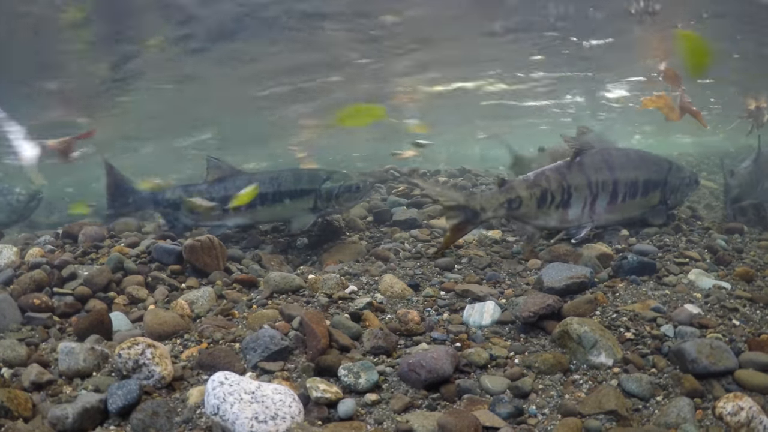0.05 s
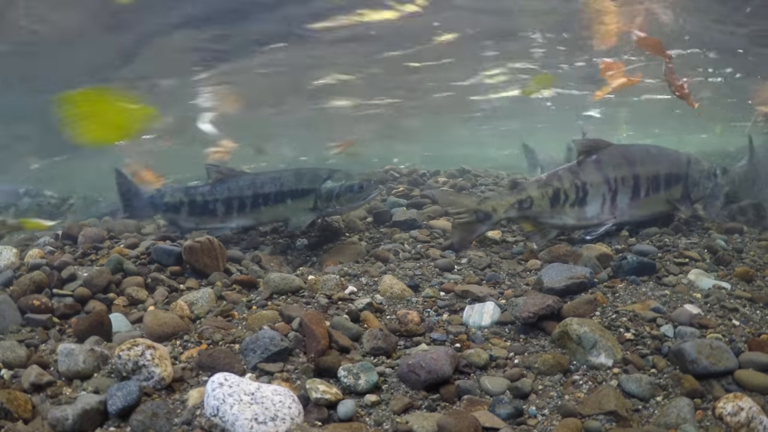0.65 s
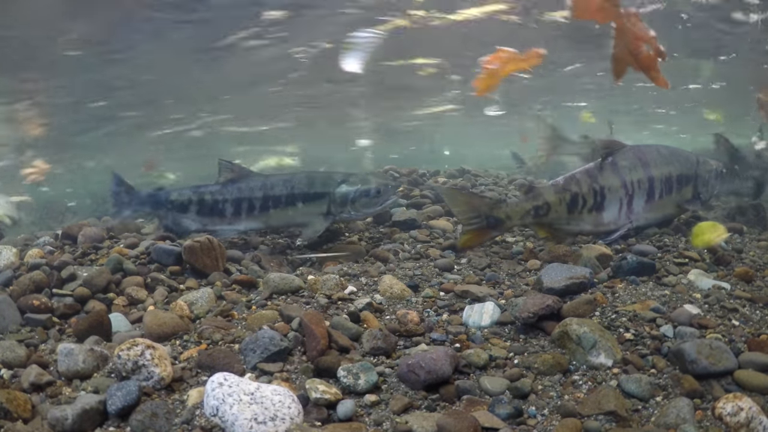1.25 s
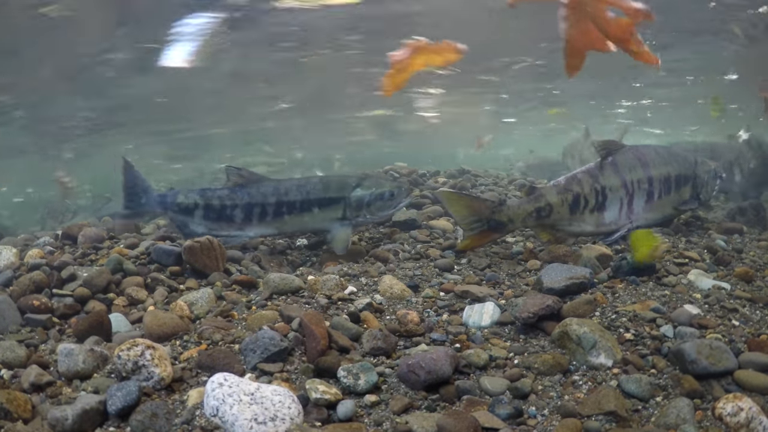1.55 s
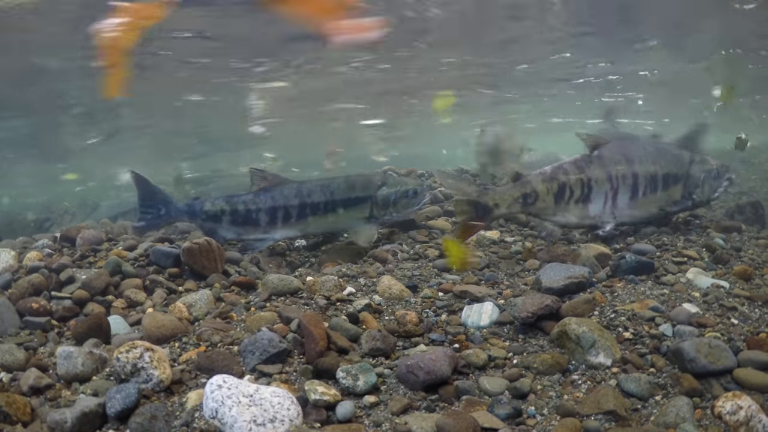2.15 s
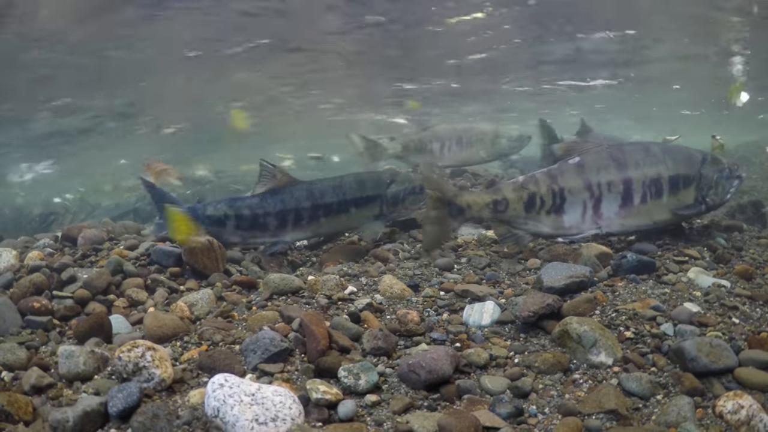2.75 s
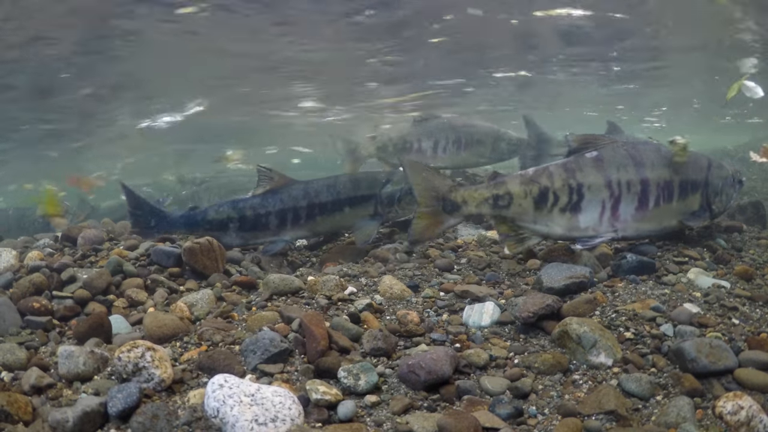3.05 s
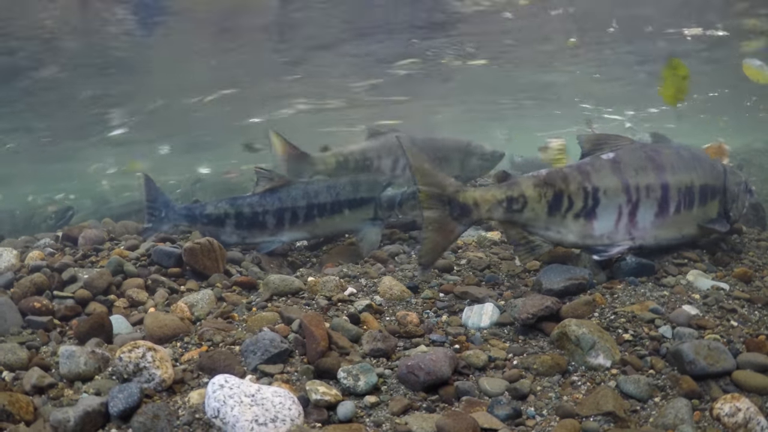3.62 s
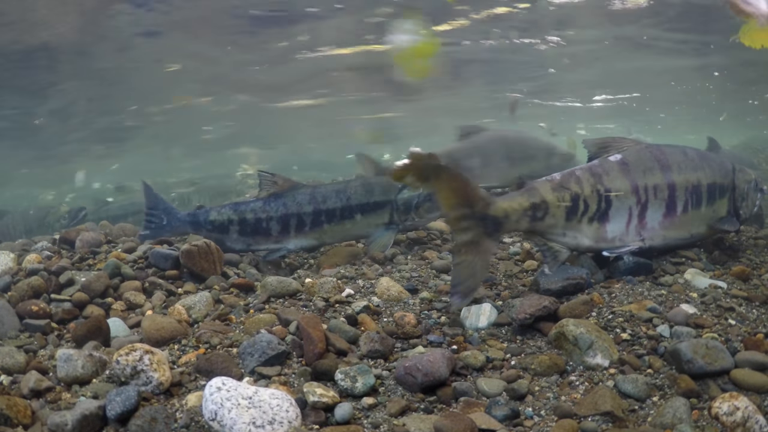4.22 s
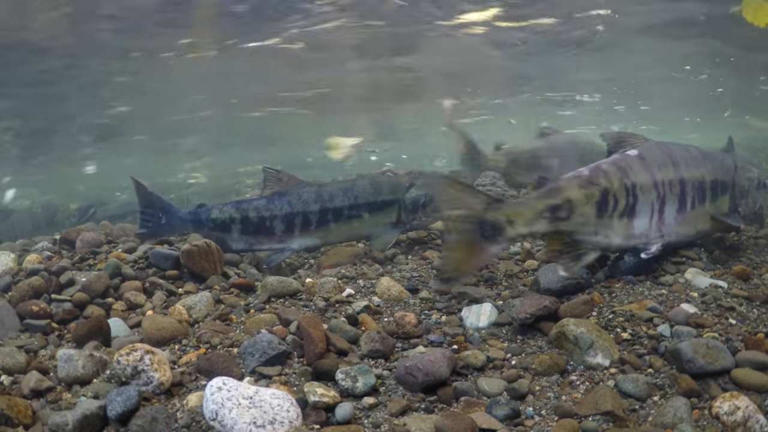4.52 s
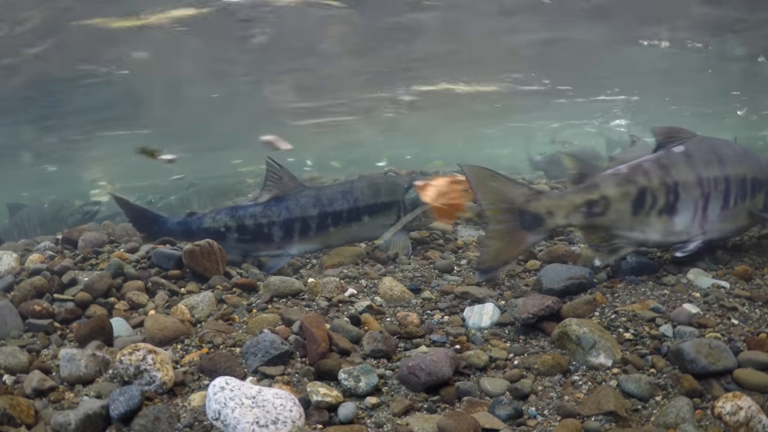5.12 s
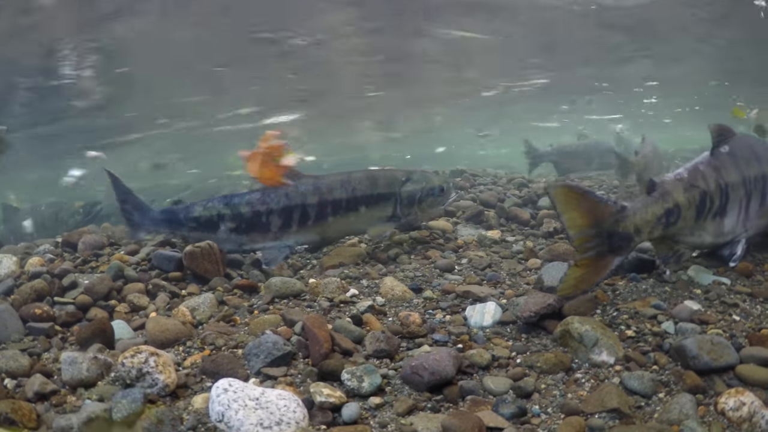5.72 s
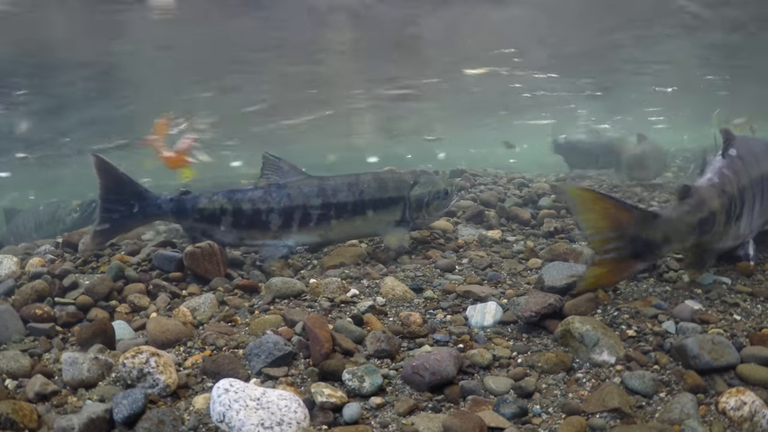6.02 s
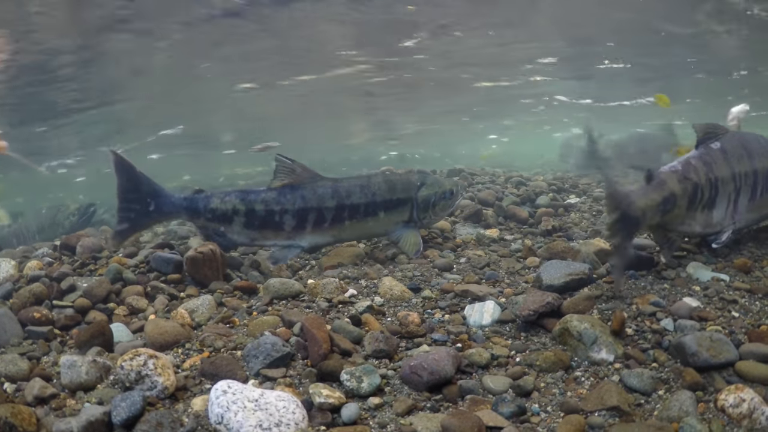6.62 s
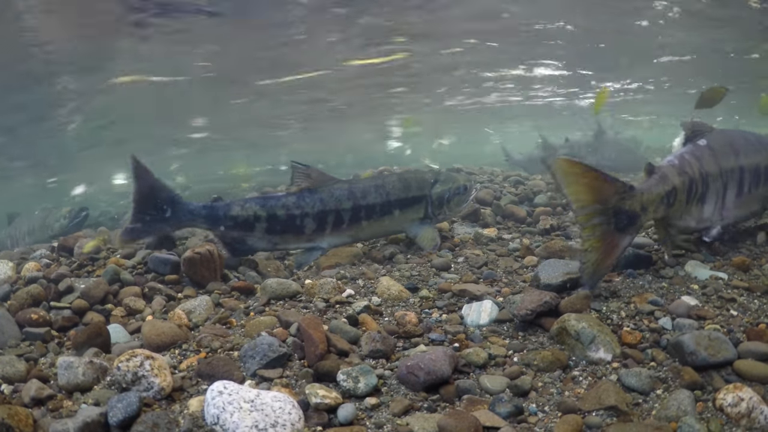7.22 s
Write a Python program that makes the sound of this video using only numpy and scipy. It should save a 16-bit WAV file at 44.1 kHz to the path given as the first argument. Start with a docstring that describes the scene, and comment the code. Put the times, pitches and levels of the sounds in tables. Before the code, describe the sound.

Sharp pebble clicks, sandy crackle and dull stone knocks sound over the deep rumble of a current, picked up underwater on a river bed. As the crackle thins, drifting leaves rub and twigs clack against the microphone housing. Past the middle, a large leaf scrapes hard over it, creaking and booming briefly. Afterwards the wide sound closes into a quieter gurgle with faint clinking grit over the rumble.

```python
"""Underwater rumble, crackle and dull knocks: a camera housing lies on a gravel river bed. The current
buffets it, sand and pebbles hit its shell, stones shift beneath it. Leaves brush past and twigs clack;
one big leaf drags hard across the case, creaks and makes it boom. The sound then narrows to a centred
gurgle with thinner crackle. Until then, flurries of sand rise and settle, carrying stray pebbles."""
import sys
import numpy as np
from scipy import signal
from scipy.fft import rfft, irfft, next_fast_len
from scipy.io import wavfile
from scipy.ndimage import uniform_filter1d, map_coordinates

SR = 44100
rng = np.random.default_rng(int(sys.argv[2]) if len(sys.argv) > 2 else 0)


def transcribe(signal):
    """Save signal, clipped to [-1, 1], as a 16-bit WAV file at the path in sys.argv[1]."""
    frames = np.atleast_2d(signal).T
    limited = np.clip(frames, -1, 1)
    pcm = np.round(limited * 32767).astype(np.int16)
    wavfile.write(sys.argv[1], SR, pcm)


N = 329427
TIME = np.arange(N) / SR
NARROW_S = 6.195  # the centred sound has taken over
JERKS_PER_S = 180  # stick-slip of drift on the case

# Fade of the wide layers. Each row: time in seconds, gain in dB.
WIDE_FADE = [(0, 3), (5.35, 2.5), (5.7, -6.5), (6.1, -19.5), (6.5, -65.5)]
# High shell resonances. Each row: centre in Hz, width in Hz, boost in dB.
SHELL_MODES = [(1405, 90, 5), (1582, 50, 6), (1980, 110, 5), (2460, 90, 7), (3210, 100, 6.5),
               (3600, 150, 9), (4370, 180, 6), (4770, 380, 5), (5620, 300, 8.5), (6840, 170, 6)]
# Hollow case resonances. Each row: centre in Hz, width in Hz, boost in dB.
CASE_MODES = [(243, 38, 3.4), (402, 22, 8.8), (453, 35, 6.5), (593, 41, 7.9), (830, 61, 11.9),
              (1006, 71, 5.1), (1030, 34, 3.7)]
# Stones grinding on the case. Each row: frequency in Hz, relative level in dB.
GRIND_SPECTRUM = [(60, -6), (230, 1), (310, 3.5), (400, 0.5), (520, -1.5), (720, -7), (1000, -16.5),
                  (1500, -16), (2500, -30.5), (6000, -70.5)]


def pebbles():
    """Pebbles crack on the shell; heavier, lower ones leave it ringing more."""
    # Each row: start in seconds, level in dB, pitch in Hz.
    hits = [(0.212, -36, 4320), (0.7109, -31.5, 6900), (0.861, -27, 5600), (0.873, -23.5, 5400),
            (0.947, -23, 6000), (0.995, -23, 5620), (1.048, -30.5, 5350), (1.111, -27, 5800),
            (1.2037, -24, 5340), (1.25, -20.5, 3380), (1.2723, -19.5, 3090), (1.322, -17, 4730),
            (1.333, -13, 1530), (1.3959, -21.5, 2270), (1.431, -24.5, 5700), (1.454, -17.5, 5960),
            (1.4647, -13, 1805), (1.5413, -19.5, 1980), (1.6552, -25.5, 5290), (1.696, -29, 1650),
            (1.8276, -27.5, 2250), (1.844, -30.5, 2510), (1.8924, -20, 2290), (1.9787, -32, 3570),
            (2.1504, -23, 4930), (2.2873, -28.5, 2920), (2.487, -21.5, 5460), (2.58, -21, 2376),
            (2.674, -31.5, 3530), (2.779, -29, 3390), (2.861, -33.5, 4960), (2.984, -33.5, 4280),
            (3.083, -36.5, 4800), (4.8642, -35, 5420), (5.0727, -27.5, 4200), (5.127, -33.5, 4650),
            (5.1501, -25.5, 6260), (5.3, -37.5, 7800)]
    # Longest shell rings. Each row: frequency in Hz, relative level in dB, T60 in seconds.
    rings = [(1567, -21, 0.42), (1604, -29, 0.28), (2137, -39, 0.06), (2440, -36, 0.06), (3590, -39, 0.12),
             (5570, -30, 0.15)]
    # Each row: frequency in Hz, relative level in dB.
    spectrum = [(500, -15), (950, -8), (1400, -1.5), (1850, -0.5), (2900, -0.5), (3600, 1), (4050, -5),
                (4600, 0.5), (5500, 1), (6200, -3), (7200, -1.5), (8500, -10), (10300, -14.5), (12000, -25),
                (15000, -28)]
    right_lead_rad, corner_hz, fall_db_per_oct = 0.68, 1900, 10
    cracks, ringing, t = np.zeros((2, N)), np.zeros((2, N)), TIME[:SR // 2]
    ring = sum(amp(db - 60 * t / t60_s) * np.sin(2 * np.pi * hz * t + [[0], [right_lead_rad]])
               for hz, db, t60_s in rings)
    stray_db = sand_level_db() + curve(WIDE_FADE) - 2
    for s, db, hz in hits + strays(stray_db, hz=4800, spread_db=7, count=50):
        crack = click(spectrum, SHELL_MODES, hz, rise_cycles=0.36, cycles=42, tail_db=-19.5, tail_s=0.2)
        add(cracks, s, at_level(crack, db))
        add(ringing, s, amp(db - fall_db_per_oct * max(np.log2(hz / corner_hz), 0)) * ring)
    return ports(cracks, apart=0.84) * amp([[.7], [-.7]]) + ringing


def strays(level_db, hz, spread_db, count):
    """Random hits as (s, dB, Hz) rows, denser and stronger where the level is high."""
    when, size, pitch = rng.random((count, 3)).T
    activity = np.cumsum(np.sqrt(amp(level_db)))
    s = np.interp(when * activity[-1], activity, TIME)
    db = np.interp(s, TIME, level_db) + spread_db * (2 * size - 1)
    return list(zip(s, db, hz * 2 ** (pitch - .5)))


def click(spectrum, modes, hz, rise_cycles, cycles, tail_db, tail_s):
    """One contact: a crack with the stone's sinking note, then faint scatter from the bed."""
    def shade_db(octave):  # a stone excites less away from its own pitch
        above_oct = octave - np.log2(hz)
        return -np.minimum(np.maximum(-5.5 * above_oct, 4.5 * above_oct), 15)
    t = TIME[:SR // 8]
    t60_s = 0.0096 + cycles / hz
    envelope = amp(-60 * t / t60_s) * (1 - np.exp(-t * hz / rise_cycles))
    crack = noise(len(t)) * (envelope + amp(tail_db - 60 * t / tail_s))
    crack[0] += envelope * sinking(hz, t, sharp=0.276, settle_s=0.0015) / 2
    return colour(crack, spectrum, modes, shade_db)


def knocks():
    """Stones bump the case and grind briefly; harder bumps ring its higher modes more."""
    # Each row: start in seconds, relative level in dB, brightness in dB.
    bumps = [(0.021, -32.5, -3), (0.069, -35.5, -4), (0.095, -29.5, -3.5), (0.129, -27.5, -7),
             (0.154, -24.5, -3), (0.208, -27.5, -22), (0.242, -36, -9), (0.281, -25.5, -11),
             (0.294, -20.5, -14), (0.318, -30, -19), (0.337, -30, -17), (0.542, -26.5, -15),
             (0.56, -25.5, -36), (0.577, -24.5, -31), (0.661, -26, -11), (0.713, -27.5, -29),
             (0.818, -30, -19), (0.83, -28, -4), (0.845, -28.5, -20), (0.859, -27, -22), (0.992, -34, -19),
             (1.106, -33, -24), (1.17, -35, -18), (1.665, -28.5, -30), (1.691, -34, -24),
             (1.917, -29.5, -15), (1.975, -36, -17), (2.16, -26.5, -7), (2.182, -29.5, -21),
             (2.42, -25.5, -23), (2.571, -33, -18), (2.651, -29.5, -19), (2.844, -29, -14), (2.872, -32, 4),
             (2.998, -22, -16), (3.013, -27.5, -18), (3.058, -33, -10), (3.095, -29, -14), (3.93, -29, -19),
             (3.963, -29.5, -8), (4.285, -32.5, -16), (4.605, -28, -18), (4.899, -27, -25),
             (6.977, -28.5, -35), (7.392, -34, -30)]
    # Each row: nominal frequency in Hz, relative level in dB, T60 in seconds.
    modes = [(393.4, 9, 0.072), (595, 9.5, 0.039), (767, 14, 0.029), (1165, 5, 0.023)]
    rise_s, neutral_bright_db, grind_db, grind_t60_s, narrow_db = 0.0012, -2, -6.5, 0.12, -9.5
    track, t = np.zeros((2, N)), TIME[:SR // 5]
    for s, db, bright_db in bumps:
        detune = 1 + 0.055 * rng.uniform(-1.4, 1.28)
        thud = 0
        for hz, mode_db, t60_s in modes:
            hardness_db = (bright_db - neutral_bright_db) * min(np.log2(hz / modes[0][0]), 1)
            tone = sinking(hz * detune, t, sharp=0.19, settle_s=0.014)
            thud += amp(mode_db + hardness_db - 60 * t / t60_s) * tone
        add(track[0], s, amp(db) * thud * (1 - np.exp(-t / rise_s)))
        grind = noise(len(t)) * amp(-60 * t / grind_t60_s)
        add(track, s, amp(db + grind_db) * colour(grind, GRIND_SPECTRUM, CASE_MODES))
    return np.where(TIME < NARROW_S, ports(track, apart=0.66), amp(narrow_db) * track[0])


def leaves():
    """Soft leaves rub hollowly over the case."""
    # Each row: start in seconds, level in dB, contact in seconds, tilt in dB per octave.
    rubs = [(3.25, -32.5, 0.08, 1), (3.332, -30, 0.065, 6), (3.389, -28, 0.053, 7),
            (3.476, -30.5, 0.023, -0.5), (4.486, -35.5, 0.029, 9), (4.9, -38, 0.14, -6.5),
            (5.395, -14, 0.052, 4.5), (5.443, -15, 0.028, -2), (5.478, -23, 0.073, -1.5),
            (5.528, -20, 0.05, 1.5), (5.585, -23.5, 0.048, -1.5), (5.652, -25, 0.032, -2)]
    # Each row: frequency in Hz, relative level in dB.
    spectrum = [(50, -5.5), (220, 1), (310, 0), (450, -2.5), (700, -9.5), (1100, -8), (1500, -17.5),
                (1800, -20.5), (2300, -27.5), (3500, -34.5), (6500, -38.5), (9000, -55), (15000, -101)]
    return scrapes(rubs, spectrum, swell_s=0.006, t60_s=0.075, lumps_db=2.5)


def twigs():
    """Woody drift clacks on the case."""
    # Each row: start in seconds, level in dB.
    hits = [(3.244, -25), (4.4304, -16), (5.325, -22.5), (5.393, -20.5)]
    # Each row: frequency in Hz, relative level in dB.
    spectrum = [(100, -18), (500, -10.5), (930, 13.5), (1400, 5.5), (2300, 0.5), (2700, -0.5), (3600, -1),
                (4300, -5.5), (7000, -16.5), (12000, -36)]
    contact_s = 0.004
    clacks = [(s, db, contact_s, 0) for s, db in hits]
    return scrapes(clacks, spectrum, swell_s=0.0015, t60_s=0.038, lumps_db=2.6)


def scrapes(contacts, spectrum, swell_s, t60_s, lumps_db):
    """Drift drags over the case in uneven lumps that ring its hollow resonances."""
    # Each row: centre in Hz, width in Hz, boost in dB.
    rasp_modes = [(648, 160, 12), (1075, 34, 2.7), (1350, 79, 8.3), (1580, 46, 6.8), (2100, 530, 2.4),
                  (3770, 44, 3.6)]
    track = np.zeros((2, N))
    friction = unit(amp(lumps_db * wobble(JERKS_PER_S)) * noise())
    for s, db, hold_s, tilt_db_per_oct in contacts:
        envelope = stroke(swell_s, t60_s, hold_s)
        jerks = friction[:, round(s * SR):][:, :len(envelope)]
        shade_db = lambda octave: tilt_db_per_oct * np.clip(octave, np.log2(300), np.log2(3500))
        add(track, s, amp(db) * colour(jerks * envelope, spectrum, CASE_MODES + rasp_modes, shade_db))
    return ports(track, apart=0.46)


def creaks():
    """A bending leaf sticks and slips: a rough note that slides as the bend changes."""
    # Each row: start in seconds, relative level in dB, length in seconds, first and last pitch in Hz.
    bends = [(3.247, -34.5, 0.038, 237, 270), (3.341, -30, 0.04, 286, 223), (3.338, -32.5, 0.036, 684, 740),
             (3.394, -33.5, 0.047, 243, 277), (3.398, -32, 0.051, 688, 700), (3.394, -30, 0.06, 960, 980),
             (4.474, -42, 0.066, 1035, 866), (5.393, -22.5, 0.03, 1423, 1295),
             (5.395, -25, 0.068, 1162, 1096), (5.401, -24.5, 0.044, 474, 400),
             (5.453, -15, 0.0262, 686, 388), (5.535, -24, 0.037, 670, 742), (5.538, -21.5, 0.067, 450, 379),
             (5.647, -34, 0.054, 457.6, 378)]
    rough_db = 2.5
    track = np.zeros((2, N))
    waver_rad = 0.75 * np.array([wobble(JERKS_PER_S), wobble(JERKS_PER_S)]) + [[0], [np.pi / 2]]
    grip = unit(amp(rough_db * wobble(JERKS_PER_S)))
    for s, db, length_s, first_hz, last_hz in bends:
        progress = np.linspace(0, 1, round(length_s * SR))
        span = round(s * SR) + np.arange(len(progress))
        phase = 2 * np.pi * np.cumsum(first_hz * (last_hz / first_hz) ** progress) / SR
        envelope = np.sqrt(np.abs(np.sin(np.pi * progress))) * grip[span]
        add(track, s, 2 * amp(db) * envelope * np.sin(phase + waver_rad[:, span]))
    return ports(track, apart=0.45)


def booms():
    """Each tug of the big leaf rocks the housing at the pitch of its mount."""
    # Each row: start in seconds, relative level in dB, pitch in Hz, T60 in seconds.
    tugs = [(5.397, -11, 135, 0.2), (5.476, -14.5, 125, 0.09), (5.554, -13, 142.3, 0.38),
            (5.656, -23, 132.8, 0.187)]
    track, waver_rad = np.zeros(N), 0.33 * wobble(39)
    for s, db, hz, t60_s in tugs:
        envelope = stroke(swell_s=0.01, t60_s=t60_s)
        phase = 2 * np.pi * hz * TIME + np.roll(waver_rad, -round(s * SR))
        add(track, s, amp(db + 5.5) * envelope * np.sin(phase[:len(envelope)]))
    return track * amp([[.7], [-.7]])


def current():
    """Turbulence presses on the housing; passing eddies shake it on its mount."""
    # The low rumble swells at the big leaf, ducks just after, then recovers.
    # Each row: time in seconds, relative level in dB.
    rumble_levels = [(0, -31), (1.6, -34.5), (2.4, -30.5), (3.8, -35.5), (5.25, -30.5), (5.48, -27),
                     (5.85, -43.5), (6.1, -34), (7.47, -31.5)]
    # Each row: peak time in seconds, drone level in dB.
    eddies = [(0.02, -30), (0.41, -30), (1.23, -32), (4.0, -33), (4.67, -35.5), (4.93, -35.5),
              (6.28, -29.5), (6.92, -39), (7.39, -37.5)]
    # Each row of both: frequency in Hz, relative level in dB.
    rumble_spectrum = [(5, -7.5), (14, -2), (25, -6.5), (36, -9), (50, -18.5), (85, -19), (130, -27.5),
                       (220, -46.5), (400, -94), (1000, -100)]
    drone_spectrum = [(40, -25), (85, 0.5), (120, 7), (170, -12), (240, -5), (320, -64), (800, -51.5)]
    # One row: centre in Hz, width in Hz, boost in dB.
    mount_mode = [(144.2, 18.3, 27)]
    rest_db, eddy_sigma_s = -41.5, 0.072
    rumble = amp(curve(rumble_levels) + 7 + 1.5 * wobble(6)) * unit(colour(noise(), rumble_spectrum))
    eddy_gain = sum(amp(db) * np.exp(-.5 * ((TIME - s) / eddy_sigma_s) ** 2) for s, db in eddies)
    drone_gain = np.hypot(amp(rest_db + 0.18 * wobble(15)), eddy_gain)
    common, side = rumble + drone_gain * unit(colour(noise(), drone_spectrum, mount_mode))
    return ports(np.array([common, side * amp(curve(WIDE_FADE))]), apart=0.18)


def river_bed():
    """Sand sprays on the shell, over the river's wash and jostling gravel."""
    # Each row of both: frequency in Hz, relative level in dB.
    spray_spectrum = [(900, -31), (1600, -3), (2800, -4.5), (3600, -1), (4050, -5.5), (4600, 4.5),
                      (5500, 0.5), (7200, -0.5), (8500, -5), (10300, -13.5), (12000, -28), (15000, -32)]
    wash_spectrum = [(150, 9), (350, 3.5), (550, -3.5), (900, -4), (1500, -6), (2800, -14.5), (4100, -18),
                     (5200, -11.5), (6200, -22.5), (7200, -14.5), (8500, -18.5), (10500, -21),
                     (12000, -28.5), (15000, -35.5)]
    crackle = 0.82 * grains(per_s=450, spread_db=8.5, t60_s=0.016) + 0.63 * noise()
    spray = amp(sand_level_db() + 3.5) * colour(crackle, spray_spectrum, SHELL_MODES)
    wash = amp(-49 + 2 * wobble(3.426)) * colour(noise(), wash_spectrum)
    settling = grains(per_s=90, spread_db=3, t60_s=0.04)
    jostle = amp(-52.5 + wobble(4.37)) * colour(settling, GRIND_SPECTRUM, CASE_MODES)
    return ports((spray + wash + jostle) * amp(curve(WIDE_FADE)), apart=0.52)


def sand_level_db():
    """Sand stirred by current and fish: each flurry rises fast and settles slowly to a trickle."""
    # Each row: peak time in seconds, relative level in dB.
    flurries = [(0.858, -43), (1.258, -41), (2.493, -53.5), (2.799, -59.5), (5.151, -54.5)]
    trickle_db, rise_s, settle_db_per_s = -61, 0.025, 14
    power = amp(2 * trickle_db)
    for s, db in flurries:
        onset = np.clip(1 + (TIME - s) / rise_s, 0, 1)
        power += amp(2 * (db - settle_db_per_s * np.maximum(TIME - s, 0))) * onset ** 2
    return 10 * np.log10(power)


def centre_wash():
    """A mono gurgle and fizz fade in, with fine grit clinking in them."""
    # Each row: start in seconds, level in dB, pitch in Hz.
    grit = [(5.715, -61, 4440), (5.833, -58, 4420), (5.879, -52, 3670), (6.015, -46.5, 7200),
            (6.115, -47.5, 4380), (6.133, -44.5, 3940), (6.194, -47.5, 4660), (6.2253, -44, 6000),
            (6.247, -41, 6470), (6.288, -47, 3980), (6.38, -46.5, 6000), (6.552, -50, 4460),
            (6.598, -52.5, 4490), (6.934, -48.5, 2430), (7.0134, -44, 2280), (7.061, -51, 4410),
            (7.099, -41.5, 2150), (7.179, -48, 2150), (7.309, -46, 2260), (7.3366, -42.5, 5150)]
    # Each row of both: frequency in Hz, relative level in dB.
    gurgle_spectrum = [(150, 9.5), (300, 1.5), (410, -6), (500, -4), (800, -8), (1300, -15), (1480, -17),
                       (1570, -13.5), (1700, -45), (3000, -37), (8000, -29)]
    fizz_spectrum = [(1100, -13), (1900, 1), (2400, 0.5), (2900, -3.5), (3400, -0.5), (3800, -4),
                     (4450, -2.5), (5100, -4.5), (5900, -11), (7500, -7), (8800, -4), (9500, -7),
                     (11500, -21.5), (15000, -42)]
    # Each row of both: centre in Hz, width in Hz, boost in dB.
    hollow_mode = [(412, 61, 4.4)]
    clink_modes = [(1570, 27, 16), (2050, 56, 3.7), (4430, 650, 8.2)]
    rise_db_per_s, gurgle_lag_s = 27.5, 0.035
    gurgle_db = -45.5 + rise_db_per_s * np.minimum(TIME - NARROW_S - gurgle_lag_s, 0)
    fizz_db = -58.5 + rise_db_per_s * np.minimum(TIME - NARROW_S, 0)
    track = amp(gurgle_db + 2.2 * wobble(21)) * colour(noise(), gurgle_spectrum, hollow_mode)
    fizz = 0.83 * grains(per_s=110, spread_db=4, t60_s=0.012) + 0.84 * noise()
    track += amp(fizz_db) * colour(fizz, fizz_spectrum, clink_modes)
    for s, db, hz in grit:
        tick = click(fizz_spectrum, clink_modes, hz, rise_cycles=8, cycles=70, tail_db=-24, tail_s=0.13)
        add(track, s, at_level(tick, db))
    return track[0]


def ports(pair, apart):
    """The flexing case carries row 0 to both microphones; a share of row 1 sets them apart."""
    # Each row: frequency in Hz, lead of the left channel in radians.
    left_lead = [(190, 0), (310, -2.3), (620, -2.5), (900, -3), (1550, -2.8), (2050, -4.3), (2550, -7.8),
                 (3500, -6.7), (4100, -4.2), (5100, -3.4), (5900, -5.4), (6700, -6), (7700, -8.5),
                 (10200, -6.2)]
    size, hz = grid(pair)
    common, side = rfft(pair, size)
    turn = np.exp(1j * along(left_lead, hz) / 2)
    left, right = (common + apart * side) * turn, (common - apart * side) / turn
    return irfft([left, right], size)[:, :N] / np.hypot(1, apart)


def colour(x, spectrum, modes=(), shade_db=lambda octave: 0):
    """Minimum-phase filter of unit power: broad spectrum, resonances and a shade over log2 Hz."""
    size, hz = grid(x)
    peaks = sum(amp(2 * db) / (1 + (2 * (hz - centre) / width) ** 2) for centre, width, db in modes)
    gain = unit(amp(along(spectrum, hz) + shade_db(np.log2(hz + 1))) * np.sqrt(1 + peaks))
    cepstrum = irfft(np.log(gain + 1e-6))[:size // 2]
    cepstrum[1:] *= 2
    return irfft(rfft(x, size) * np.exp(rfft(cepstrum, size)), size)[..., :x.shape[-1]]


def grains(per_s, spread_db, t60_s):
    """Crackle of rms 1: tiny random impacts, most faint, a few strong."""
    struck = rng.random(N) < per_s / SR
    hit_db = spread_db * np.minimum(rng.exponential(size=N), 4)
    power = signal.lfilter([1], [1, -amp(-120 / (t60_s * SR))], struck * amp(2 * hit_db))
    return unit(np.sqrt(power) * noise())


def sinking(hz, t, sharp, settle_s):
    """A sine that starts sharp by a fraction and settles on its pitch."""
    return np.sin(2 * np.pi * hz * (t + sharp * settle_s * (1 - np.exp(-t / settle_s))))


def stroke(swell_s, t60_s, hold_s=0):
    """Envelope: swell to 1, hold, decay."""
    t = TIME[:SR // 2]
    swell = np.sin(np.pi / 2 * np.minimum(t / swell_s, 1)) ** 2
    return swell * amp(-60 * np.maximum(t - swell_s - hold_s, 0) / t60_s)


def wobble(per_s):
    """Smooth random curve with per_s knots a second."""
    return map_coordinates(rng.standard_normal(int(N * per_s / SR) + 4), [TIME * per_s])


def noise(size=N):
    """Two independent white noises."""
    return rng.standard_normal((2, size))


def add(track, s, sound):
    """Mix a sound in at s seconds."""
    start = max(round(s * SR), 0)
    track[..., start:start + sound.shape[-1]] += sound[..., :max(N - start, 0)]


def at_level(x, db):
    """Set the rms of the loudest 5 ms of row 0."""
    return x * amp(db) / np.sqrt(uniform_filter1d(x[0] ** 2, size=220).max())


def amp(db):
    """Decibels to gain."""
    return 10 ** (np.asarray(db) / 20)


def unit(x):
    """Scale to rms 1."""
    return x / np.sqrt(np.mean(x ** 2) + 1e-20)


def along(points, hz):
    """Interpolate (Hz, value) rows on a log axis."""
    knots_hz, values = np.transpose(points)
    return np.interp(np.log(hz + 1), np.log(knots_hz + 1), values)


def curve(points):
    """Interpolate (s, value) rows at every sample."""
    return np.interp(TIME, *np.transpose(points))


def grid(x):
    """Padded FFT length and its frequencies in Hz."""
    size = 2 * next_fast_len(x.shape[-1] // 2 + 2048)
    return size, np.fft.rfftfreq(size, 1 / SR)


def scene():
    """Everything that reaches the two microphones."""
    bed = current() + river_bed() + pebbles() + knocks()
    drift = leaves() + twigs() + creaks() + booms()
    return bed + drift + centre_wash()


def record(dry):
    """Round off the loudest peaks, then limit the band."""
    ceiling, top_hz = 0.93, 15450
    rounded = dry / (1 + (dry / ceiling) ** 8) ** (1 / 8)
    size, hz = grid(dry)
    return irfft(rfft(rounded, size) * (hz < top_hz), size)[:, :N]


dry = scene()
out = record(dry)
transcribe(out)
```